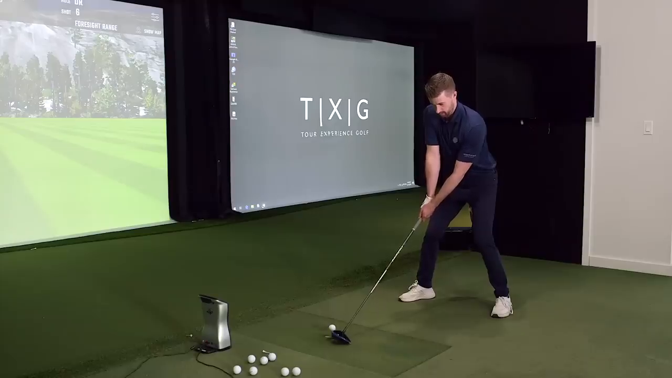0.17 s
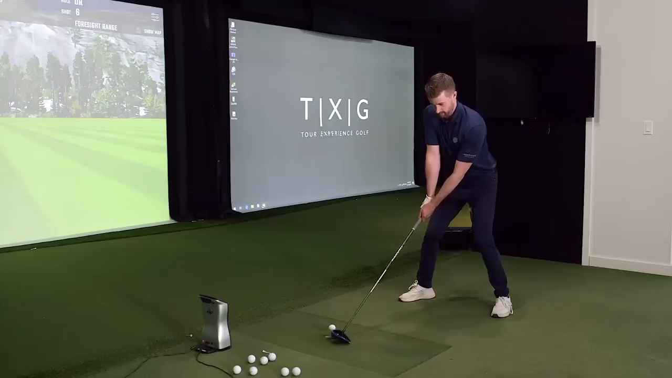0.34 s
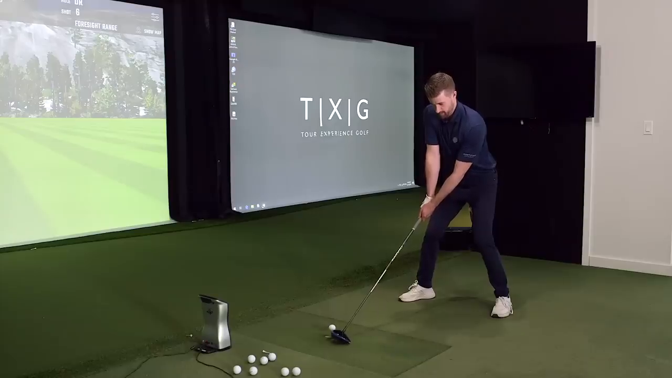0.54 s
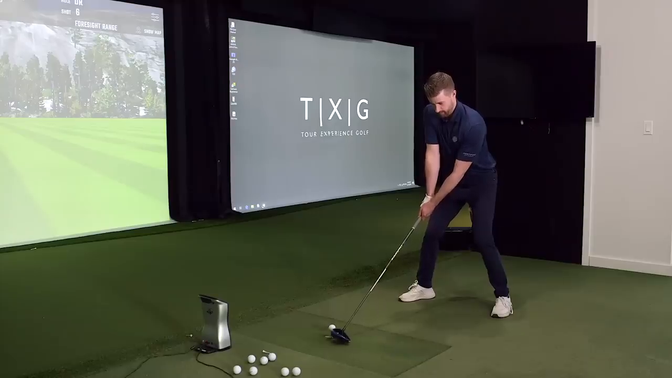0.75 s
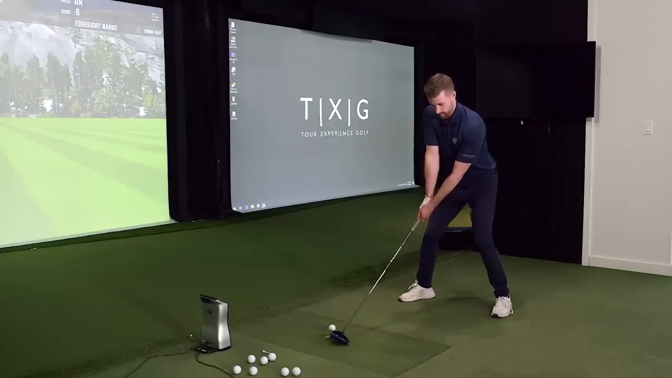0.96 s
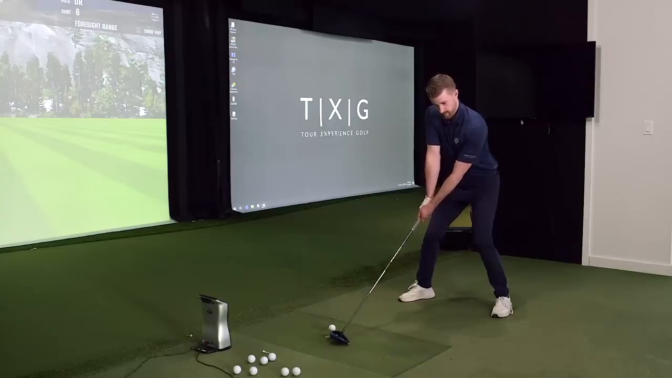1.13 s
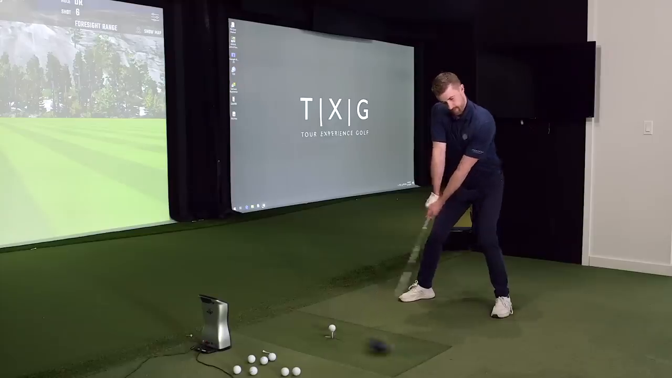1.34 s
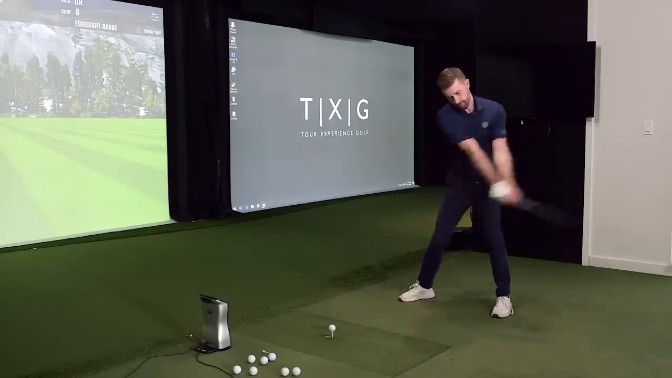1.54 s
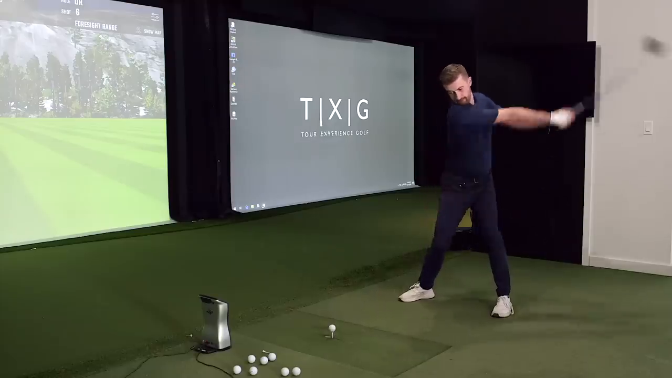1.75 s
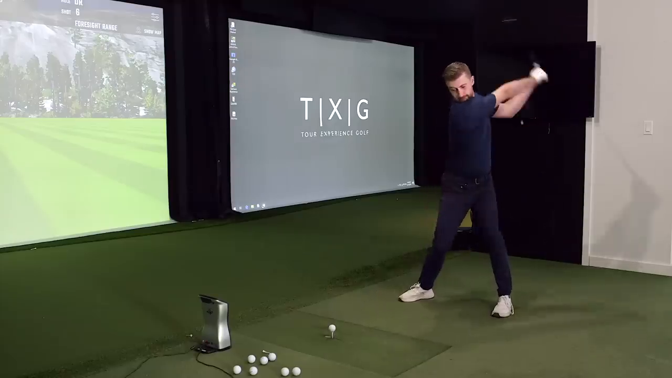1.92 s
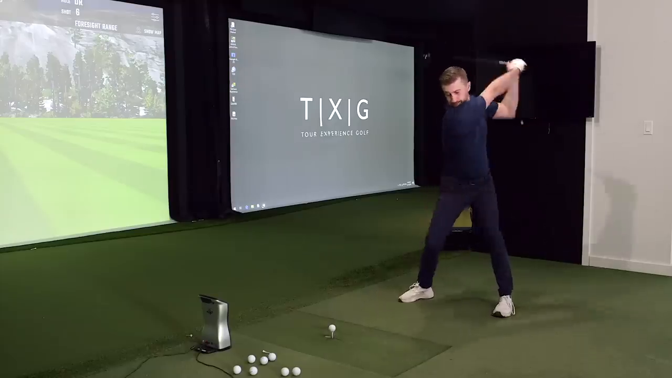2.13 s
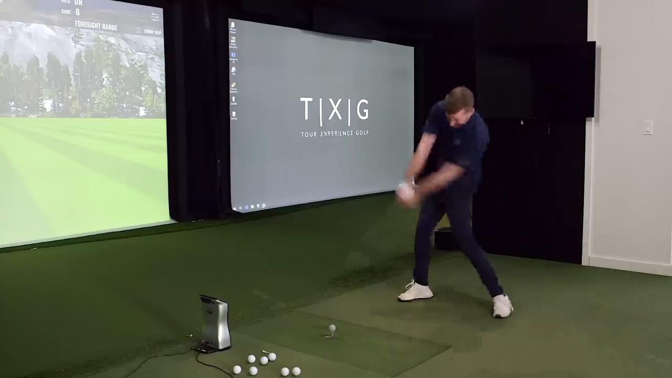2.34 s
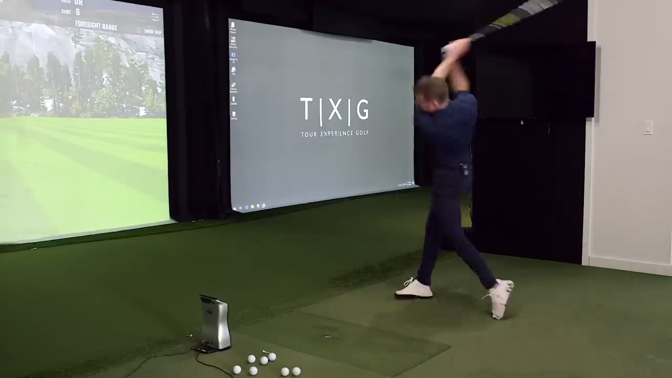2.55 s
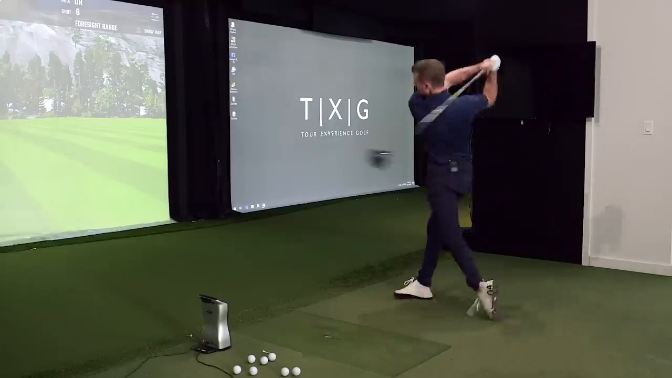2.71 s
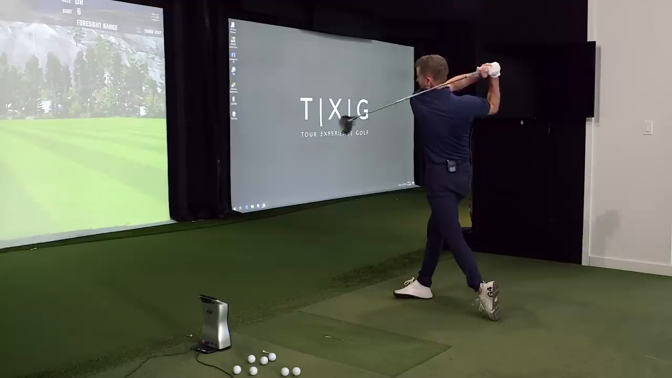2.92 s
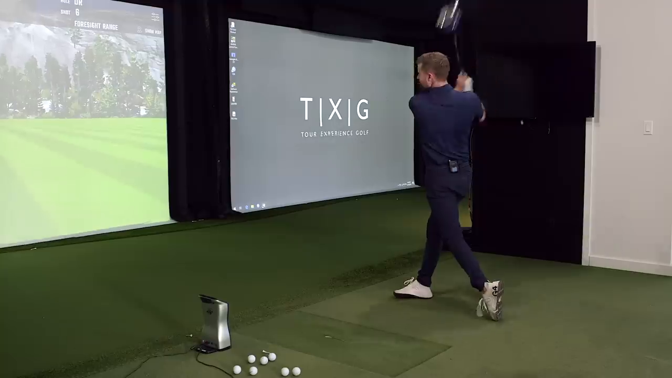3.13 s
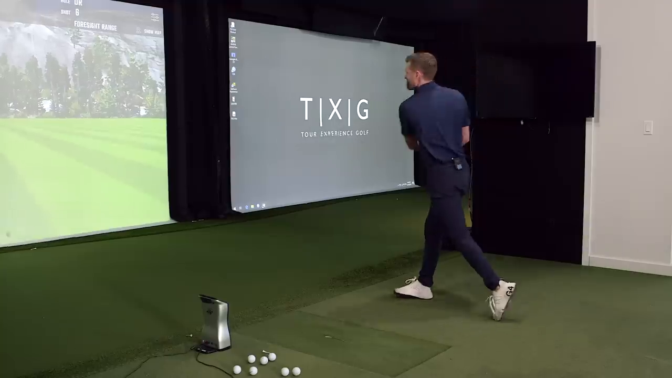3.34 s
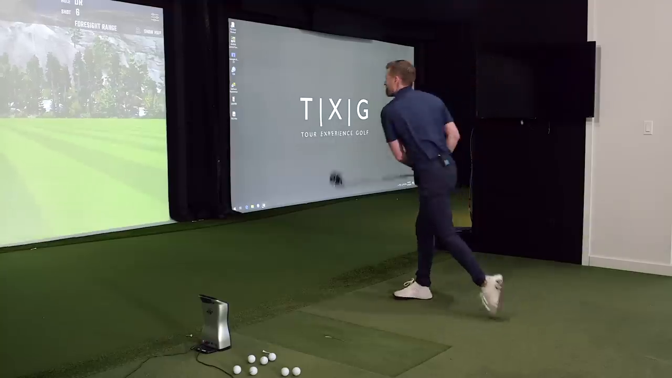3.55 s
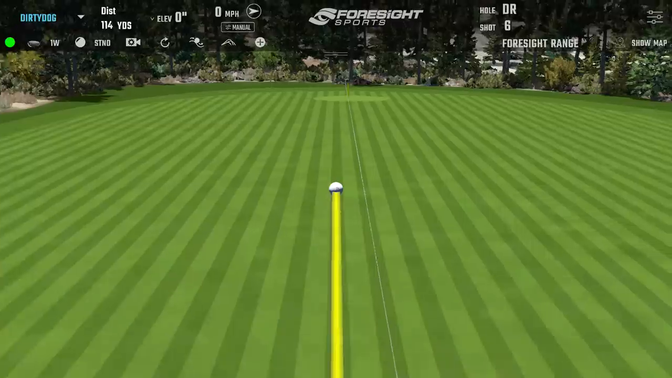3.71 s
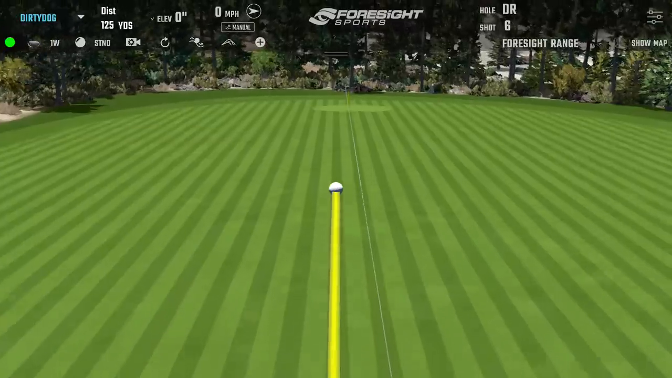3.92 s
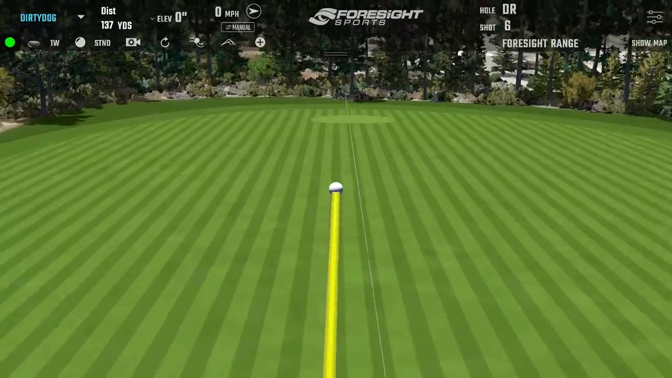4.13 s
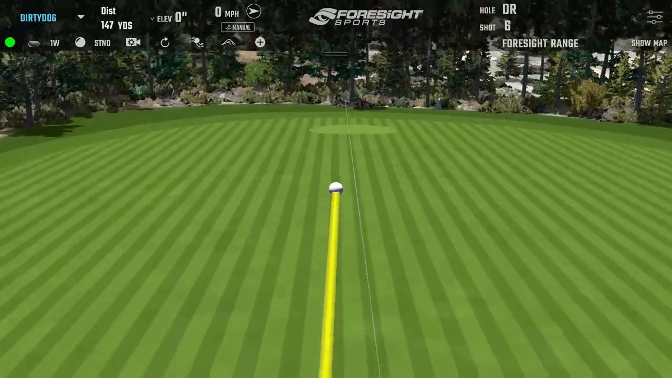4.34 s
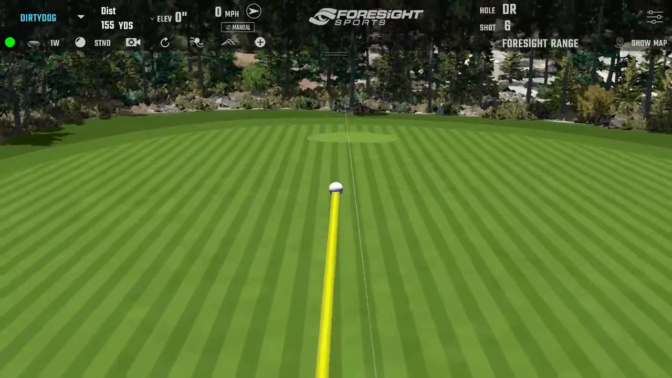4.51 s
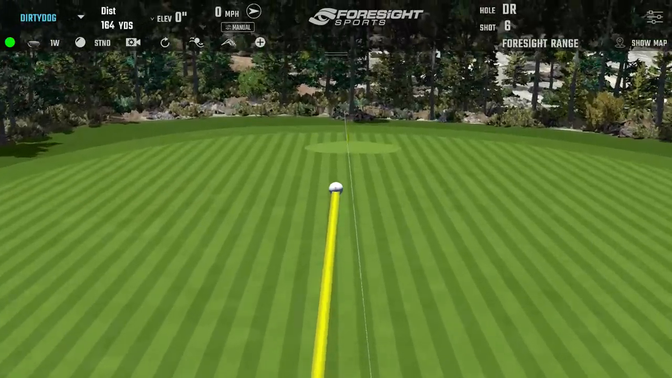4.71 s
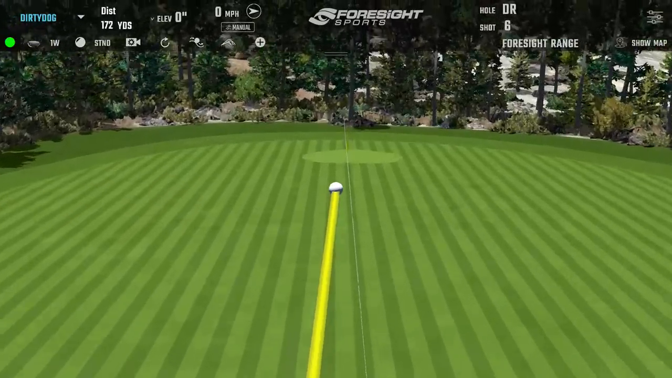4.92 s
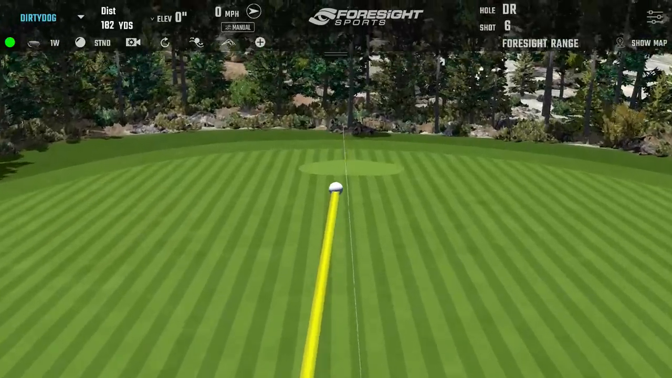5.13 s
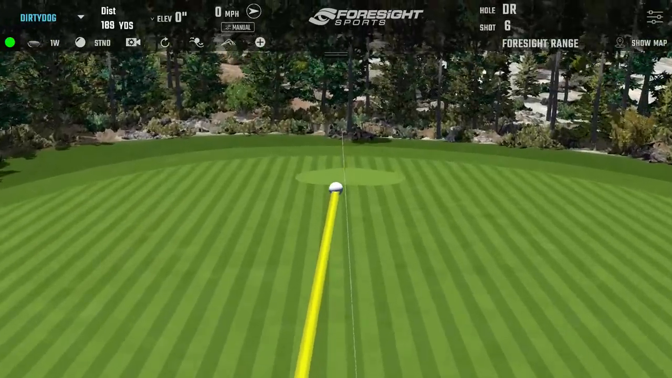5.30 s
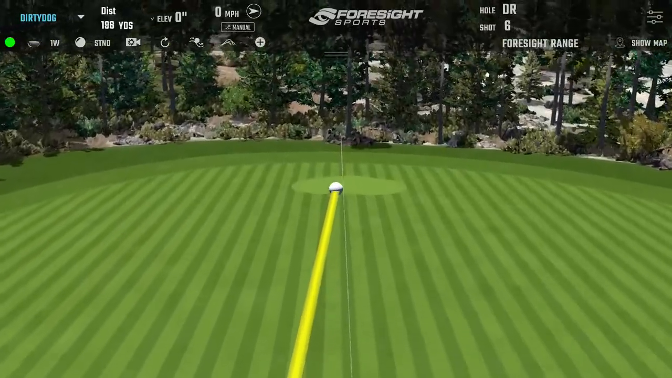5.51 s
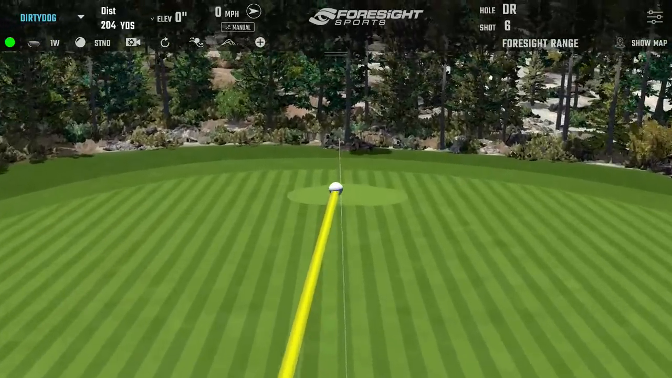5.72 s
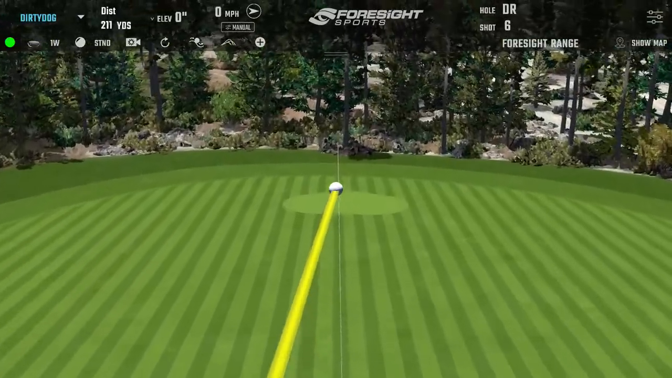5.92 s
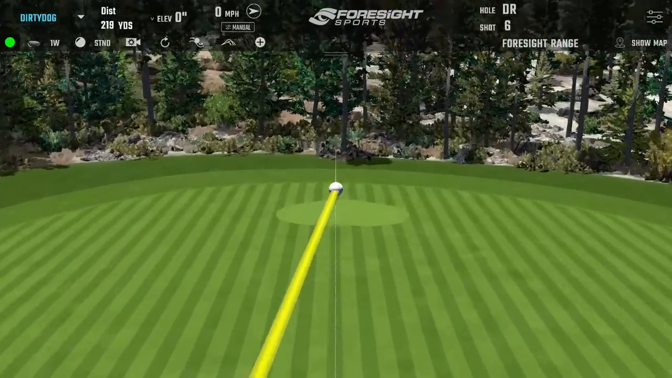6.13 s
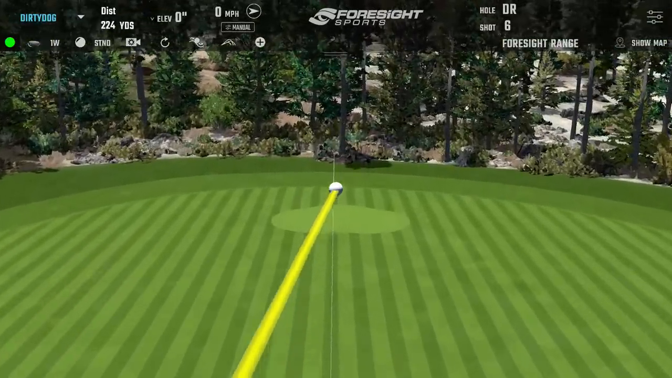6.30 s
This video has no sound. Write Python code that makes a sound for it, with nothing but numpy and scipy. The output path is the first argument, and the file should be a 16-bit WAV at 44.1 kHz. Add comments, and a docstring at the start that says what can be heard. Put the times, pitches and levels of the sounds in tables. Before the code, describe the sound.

A hollow golf driver cracks a ball in a humming room, the ball immediately booms into a cloth screen, then a tee skitters and soft steps follow.

```python
"""An indoor golf simulator bay, under the low hum and rush of its fans: tones over shaped noise.
Grainy noise rustles as clothes move, dry pops hit the microphone, and the club whooshes down in vortex tones.
The hollow metal head cracks as a click with ringing modes and overloads the microphone.
The ball thuds into the modes of the screen and the room answers with decaying noise.
The tee skitters away in high ticks and a few soft steps of shaped noise follow."""
import sys
import numpy as np
from scipy import signal
from scipy.fft import rfft, irfft
from scipy.io import wavfile
from scipy.ndimage import uniform_filter1d

SR = 44100
rng = np.random.default_rng(int(sys.argv[2]) if len(sys.argv) > 2 else 0)


def digitize_waveform(pressure):
    """Quantize a signal to 16-bit integers and store it at the path in sys.argv[1].

    Rows of a 2-D input are taken as channels; values are limited to [-1, 1].
    """
    field = np.atleast_2d(pressure).T
    bounded = np.clip(field, -1, 1)
    quanta = np.round(bounded * 32767).astype(np.int16)
    wavfile.write(sys.argv[1], SR, quanta)


N = 284930
T = np.arange(N) / SR
TAIL = T[:int(1.4 * SR)]  # time axis of every short sound and echo

# Colour of moving air, in the ventilation and around the body.
# Each row: frequency in Hz, relative level in dB.
AIR_COLOUR = [(15, -5.5), (50, -0.5), (100, 3), (150, 0.5), (220, -4), (350, -6), (480, -7.5), (620, -10),
              (900, -15), (1550, -18.5), (2300, -29), (4000, -35), (15000, -42)]

# the microphone on the shirt is switched off: start and length of the change
MIC_OFF_S, MIC_FADE_S = 5.08, .05


def undb(db):
    """Decibels to gain."""
    return 10 ** (np.asarray(db) / 20)


def unit(x):
    """Scale to an rms of one."""
    return x / np.sqrt(np.mean(x ** 2))


def fade(t60):
    """Exponential decay by 60 dB in t60 seconds, over the length of a tail."""
    return np.exp(-np.log(1000) * TAIL / t60)


def at(s, x):
    """A sound placed at time s in silence."""
    return np.pad(x, (int(s * SR), N))[:N]


def ramp(s, length):
    """Goes from 0 to 1, starting at time s."""
    return np.clip((T - s) / length, 0, 1)


def swell(s, db, rise, fall):
    """Gain of one movement: it grows to its peak at time s and dies away."""
    shape = 1.6  # flanks: 1 is pointed, 2 is a bell
    distance = np.abs((T - s) / np.where(T < s, rise, fall))
    return undb(db) * np.exp(-distance ** shape)


def swells(table):
    """Gain of several overlapping movements; their powers add."""
    return np.sqrt(sum(swell(*row) ** 2 for row in table))


def walk(rate):
    """Smooth chance with a spread of one, drawn anew about rate times a second."""
    k = int(SR / rate)
    steps = np.repeat(rng.standard_normal(N // k + 1), k)
    return unit(uniform_filter1d(steps, k)[:N])


def read(points, hz):
    """Value of a (Hz, value) table on a log-frequency axis."""
    f, value = np.transpose(points)
    return np.interp(np.log(np.maximum(hz, 1)), np.log(f), value)


def response(points, size=8192):
    """Minimum-phase impulse response with the given (Hz, dB) spectrum, by folding its cepstrum."""
    gain = undb(read(points, np.fft.rfftfreq(size, 1 / SR)))
    cepstrum = irfft(np.log(gain))
    cepstrum[1:size // 2] *= 2
    cepstrum[size // 2 + 1:] = 0
    return np.pad(irfft(np.exp(rfft(cepstrum))), (0, len(TAIL) - size))


def through(x, h):
    """A sound passed through an impulse response."""
    return signal.fftconvolve(x, h)[:len(x)]


def noise(points):
    """Steady noise of a given colour, at an rms of one."""
    return unit(through(rng.standard_normal(N), response(points)))


def burst(points):
    """Noise of a given colour over the length of a tail, at an rms of one."""
    return unit(through(rng.standard_normal(len(TAIL)), response(points)))


def ring(modes):
    """Decaying sines of (Hz, t60, dB) modes."""
    return sum(undb(db) * fade(t60) * np.sin(2 * np.pi * hz * TAIL) for hz, t60, db in modes)


def tone(hz, db):
    """A steady tone whose level and phase wander a little."""
    level = undb(db + 1.5 * walk(1.5))
    return np.sqrt(2) * level * np.sin(2 * np.pi * hz * T + .25 * walk(2.7))


def hum(hz, levels_db, lowest_db, overtones_db):
    """A turning shaft and its multiples; the lowest tone and the overtones change level separately."""
    return sum(tone(k * hz, db + (lowest_db if k == 1 else overtones_db))
               for k, db in enumerate(levels_db, 1))


def room(early_db, early_t60, build_s):
    """Dense echoes: a burst from near walls, a tail whose treble dies first, a dull linger from the hall beyond."""
    # Reverberation of the room. Each row: frequency in Hz, decay by 60 dB in seconds.
    decay_times = [(60, .85), (150, .95), (500, .85), (1200, .88), (3000, 0.81), (5000, .68), (8000, .45),
                   (14000, .3)]
    linger_db, linger_t60, linger_hz = -19, 1.4, 5000
    spectrum, hz = rfft(rng.standard_normal(len(TAIL))), np.fft.rfftfreq(len(TAIL), 1 / SR)
    centres = np.geomspace(60, 15000, 16)  # Hz
    tail = 0
    # overlapping bands of one noise, each with its own decay
    for centre, share in zip(centres, np.eye(len(centres))):
        band = irfft(spectrum * read(np.c_[centres, share], hz), len(TAIL))
        linger = undb(linger_db) * fade(linger_t60) / (1 + (centre / linger_hz) ** 6)
        tail = tail + band * (fade(read(decay_times, centre)) + linger)
    early = 1 + undb(early_db) * fade(early_t60)
    build = 1 - np.exp(-(TAIL / build_s) ** 2)
    return tail * early * build


def fans():
    """Turning shafts give steady tones that swell slowly, over the soft rush of the ventilation."""
    # Levels in dB of each multiple of the shaft rate, lowest first, before the shifts below.
    fan_db = [-55, -65, -59.5]
    motor_db = [-62.5, -55, -76, -73, -80, -71]
    # Thin whines of the equipment. Each row: frequency in Hz, level in dB.
    whine_tones = [(596, -74.5), (1545, -81)]
    shift = ramp(2.3, .9)  # the lowest tones shift during the swing
    off = ramp(MIC_OFF_S, MIC_FADE_S)
    fan = hum(46.1, fan_db, -6.5 * shift, 0)
    # the motor's overtones sink once the microphone on the shirt is off
    motor = hum(59.4, motor_db, 7.5 * shift, -5 * off)
    whines = sum(tone(hz, db) for hz, db in whine_tones)
    air_db = -55.3 - 2.7 * off + .5 * walk(3)
    return fan + motor + whines + undb(air_db) * noise(AIR_COLOUR)


def golfer():
    """Cloth slides in fine, uneven grains as the body turns and stirs air; club and shoes brush the turf."""
    # Shirt and trousers, from settling over the ball through the swing to relaxing.
    # Each row: peak in seconds, level in dB before the shirt microphone goes off, rise and fall in seconds.
    rustles = [(.47, -74, .09, .11), (.8, -68.5, .06, .07), (1.71, -59, .2, .22), (2.08, -58, .07, .1),
               (2.3, -59, .1, .1), (2.327, -41.5, .013, .013), (2.44, -39.5, .022, .05),
               (3.2, -56.5, .17, .16), (3.92, -64.5, .15, .13), (4.25, -62.5, .05, .1),
               (4.96, -57, .09, .08)]
    # Creases of cloth flicking over. Each row: start in seconds, level in dB.
    creases = [(3.611, -56), (4.38, -66), (4.535, -58.5), (4.56, -58), (4.605, -60), (4.72, -64),
               (4.737, -62)]
    # Colour of the cloth. Each row: frequency in Hz, relative level in dB.
    cloth = [(200, -9.5), (700, -2.5), (2000, 3.5), (5000, -2.5), (9000, -2.5), (15000, -2)]
    # Dull rush of air stirred by the turning body: peak in seconds, level in dB, rise and fall in seconds.
    body_stir = (1.72, -53.5, .25, 1.5)
    # The sole of the club brushing the mat at address and takeaway.
    # Each row: peak in seconds, level in dB, rise and fall in seconds.
    brushes = [(.7, -78, .2, .15), (1.17, -73.5, .1, .14), (1.4, -62.5, .06, .065)]
    # Soft steps on the turf. Each row: start in seconds, relative level in dB, time to the peak in seconds.
    footfalls = [(4.193, -58, 0.037), (5.14, -57, 0.027), (5.381, -65.5, 0.064), (5.738, -57.5, 0.02904)]
    # Colour of the turf underfoot. Each row: frequency in Hz, relative level in dB.
    turf = [(100, -1), (400, 0.5), (640, 2.5), (900, -4), (1400, 1), (2100, -4), (3000, -8), (6000, -26),
            (14000, -32)]

    # faint rustle between movements: while he stands over the ball, and once the swing has begun
    still_db, active_db, takeaway_s = -81.5, -73.5, 1.4
    resting = undb(still_db + (active_db - still_db) * ramp(takeaway_s, .3))
    mic_off = undb(-18 * ramp(MIC_OFF_S, MIC_FADE_S))
    motion = np.hypot(resting, swells(rustles)) * mic_off
    flicks = sum(undb(db) * at(s, fade(0.01972)) for s, db in creases)
    grains = undb(1.2 * walk(160))
    rustle = (motion * grains + flicks) * noise(cloth)

    stir = swell(*body_stir) * noise(AIR_COLOUR)
    sole_colour = [(2000, -20), (4000, -7.5), (5400, 0), (6800, -8), (7900, -4), (9000, -14), (15000, -18)]
    sole = swells(brushes) * noise(sole_colour)

    press = sum(undb(db) * at(s, TAIL / length * np.exp(1 - TAIL / length)) for s, db, length in footfalls)
    steps = press * noise(turf)
    echoes = through(steps, room(early_db=-10, early_t60=0.0947, build_s=0.011))
    return rustle + stir + sole + undb(-0.5) * steps + undb(-37) * echoes


def pops():
    """Small dry pops right at the microphone: a hollow double snap, then a short, dull thud."""
    # Each row: start in seconds, level of the first snap in dB, relative level of the thud in dB.
    pop_hits = [(1.308, -44, -56), (1.7801, -16, -19.5), (1.9186, -21, -31), (1.997, -40, -48),
                (2.029, -32, -44)]
    # harder pops are brighter: level of a hard pop, dB of treble per dB of snap
    hard_pop_db, brightening = -16, .35
    thud = fade(0.037) * np.cos(2 * np.pi * 62 * TAIL) * (1 - np.exp(-TAIL / 0.00012))
    out = 0
    for s, snap_db, thud_db in pop_hits:
        treble_db = brightening * (snap_db - hard_pop_db)
        snap = response([(100, -2), (900, 3), (1700, 6), (4000, treble_db - 7),
                         (9000, treble_db - 8), (15000, treble_db - 14)])
        snap = undb(snap_db) * snap / np.abs(snap).max()
        double_snap = at(s, snap) + 0.65 * at(s + .00022, snap)
        out = out - double_snap + undb(thud_db) * at(s + 0.00048, thud)
    return out


def whoosh():
    """Shed vortices rise in pitch with the shaft's speed, lower for the bulky head; pushed air buffets below."""
    # The club sweeps past, a wave of pushed air ahead of it.
    # Each: peak in seconds, level in dB, rise and fall in seconds.
    sweep = (2.435, -24.5, .03, .04)
    push = (2.375, -34.5, .045, .11)
    fastest_s, half_speed_s = 2.457, .056  # moment of top speed, time from half speed to top speed
    vortex_hz = 1110  # reference pitch at top speed; shaft and head each scale it
    speed = 1 / (1 + ((T - fastest_s) / half_speed_s) ** 2)
    vortices = 0
    # shaft, then head: pitch ratio, spread in Hz, relative level in dB
    for ratio, spread_hz, db in [(1.03, 400, -1), (.62, 420, -5)]:
        phase = 2 * np.pi * np.cumsum(ratio * vortex_hz * speed) / SR
        hiss = walk(spread_hz) * np.sin(phase) + walk(spread_hz) * np.cos(phase)
        vortices = vortices + undb(db) * unit(hiss)
    buffet = noise([(20, -8), (65, 0.5), (140, -1), (300, -20.5), (1500, -49.5)])
    return swell(*sweep) * vortices + swell(*push) * buffet


def strike():
    """The face pings for a few cycles; click and head ring slap off the near walls, then fill the room."""
    # Ring of the hollow club head. Each row: frequency in Hz, bandwidth in Hz, relative spectral peak in dB.
    head_modes = [(1180, 160, -4.5), (2800, 92, -0.5), (2946, 130, 1.5), (3550, 55, -4), (3832, 38, -8.5),
                  (5270, 100, 0), (5930, 110, -6.5), (7521, 60, -9.5), (9600, 250, -9), (10700, 140, -10)]
    # Click of the ball on the face. Each row: frequency in Hz, relative level in dB.
    click_colour = [(40, -13.5), (200, -4), (550, 1.5), (1100, -2.5), (1600, -6), (2500, -3), (4500, -2.5),
                    (6500, -6), (10000, -9.5), (15500, -15)]
    # Early echoes off mat, screen and side walls. Each row: delay in seconds, relative level in dB.
    walls = [(.0035, -6), (.0075, -7), (.0135, -6.5), (.0195, -11), (.031, -8), (.037, -11)]
    ping_hz, ping_s, ping_db = 2400, .0015, 3  # ping_s: delay of the loudest moment
    ping_shape = np.exp(-2 * (TAIL / ping_s - 1) ** 2 / .6)
    ping = undb(ping_db) * ping_shape * np.sin(2 * np.pi * ping_hz * TAIL)
    head = 0
    for hz, width, db in head_modes:
        decay = 2 * np.pi * width / SR * np.exp(-np.pi * width * TAIL)
        head = head + undb(db) * decay * np.cos(2 * np.pi * hz * TAIL)
    click = response(click_colour)
    direct = ping + undb(4) * click + undb(19) * head
    # each surface scatters its echo over a few milliseconds
    slaps = sum(undb(db) * at(s, fade(0.02) * rng.standard_normal(len(TAIL))) for s, db in walls)
    near = undb(7) * through(click + undb(4) * head, slaps[:len(TAIL)])
    echoes = room(early_db=1.5, early_t60=0.16, build_s=.008)
    far = undb(-2) * through(click + undb(-4) * head, echoes)
    return at(2.4528, direct + near + far)


def thump():
    """One deep, short low thump just after the blow."""
    return at(2.457, ring([(37, .085, -4.5), (105, .06, -15)]))


def screen():
    """The ball snaps and slaps the taut cloth, which booms and sets off the low end of the room."""
    # Modes of the struck screen and its frame. Each row: frequency in Hz, decay by 60 dB in seconds, level in dB.
    screen_modes = [(47, .9, -26), (79.3, .25, -9), (123.3, 0.7, -17), (218, .2, -11), (511.4, 0.04, -3.5),
                    (670, 0.06, -0.5)]
    # Slap of the screen cloth. Each row: frequency in Hz, relative level in dB.
    slap_colour = [(30, -17), (70, 1.5), (120, 9.5), (190, 9.5), (290, -2.5), (600, 0), (1000, -7.5),
                   (2000, -16), (8000, -26)]
    boom = ring(screen_modes) * (1 - np.exp(-TAIL / .002))
    snap = undb(-15.5) * fade(0.045) * burst([(500, 1.5), (3000, -4), (15000, -11.5)])
    echoes = through(response(slap_colour), room(early_db=1, early_t60=0.11, build_s=0.0055))
    return at(2.528, boom + snap + undb(-2.5) * echoes)


def tee():
    """The flying tee lands and bounces with thin, high ticks; each contact favours other modes."""
    # Bounces. Each row: start in seconds, relative level in dB, upper modes over lower ones in dB.
    bounces = [(2.879, -47.5, 4), (2.89, -38, -1.5), (3.498, -40, 9), (3.511, -37, 6.5), (3.694, -41.5, 7),
               (3.704, -45, -2), (3.857, -48.5, -9), (3.924, -50, -6)]
    # Modes of the tee. Each row: frequency in Hz, decay by 60 dB in seconds, relative level in dB.
    tee_modes = [(5673, 0.017, -18), (11401, .02, -2), (12350, 0.021, -4), (13200, .008, -12)]
    # harder bounces tick more: a hard bounce, its tick, dB of tick per dB of bounce
    hard_bounce_db, hard_tick_db, tick_growth = -37, -34, 1.9
    contacts = 0
    for s, ring_db, upper_db in bounces:
        tilted = [(hz, t60, db + upper_db / 2 * np.sign(hz - 11800)) for hz, t60, db in tee_modes]
        ting = ring(tilted)
        tick = burst([(1500, -20), (5000, -8), (9000, 7), (15000, -3)]) * fade(0.005)
        tick_db = hard_tick_db + tick_growth * (ring_db - hard_bounce_db)
        contacts = contacts + at(s, undb(ring_db) * ting + undb(tick_db) * tick)
    echoes = through(contacts, room(early_db=4, early_t60=.1, build_s=0.0051))
    return undb(-3.5) * contacts + undb(-33) * echoes


def scene():
    """Everything in the bay, summed to one channel."""
    air_and_body = fans() + golfer() + pops()
    shot = whoosh() + strike() + thump() + screen() + tee()
    return (air_and_body + shot)[None]


def record(dry):
    """The loudest peaks overload the input and round off; the top is cut."""
    limit, knee = .95, 6  # full scale is 1; a higher knee bends more sharply
    clipped = dry / (1 + np.abs(dry / limit) ** knee) ** (1 / knee)
    low_pass = signal.ellip(10, .2, 60, 15600, fs=SR, output="sos")
    return signal.sosfilt(low_pass, clipped)


dry = scene()
out = record(dry)
digitize_waveform(out)
```